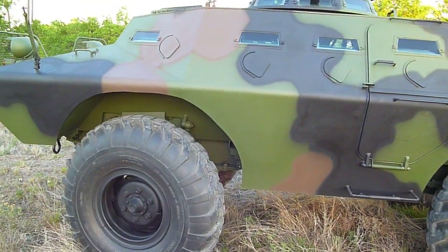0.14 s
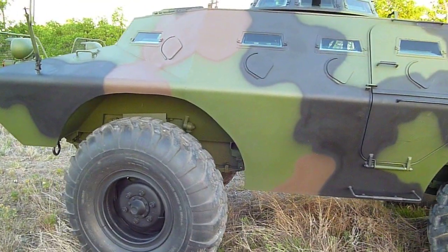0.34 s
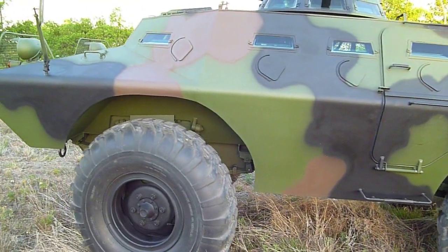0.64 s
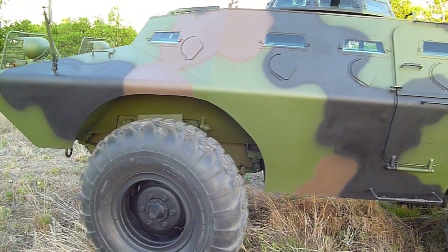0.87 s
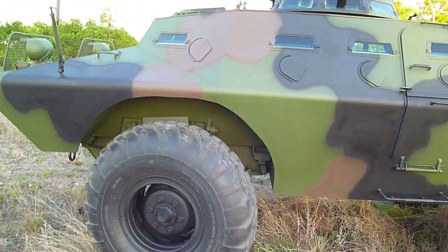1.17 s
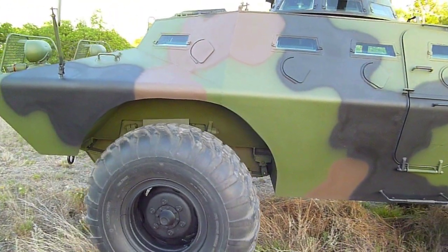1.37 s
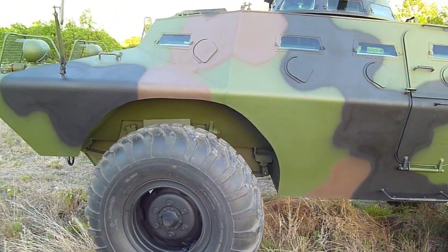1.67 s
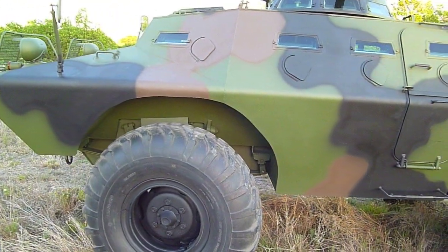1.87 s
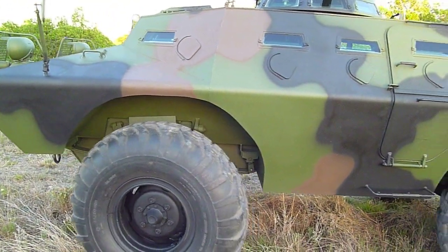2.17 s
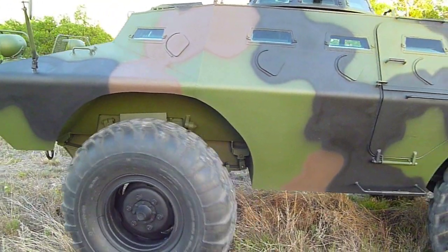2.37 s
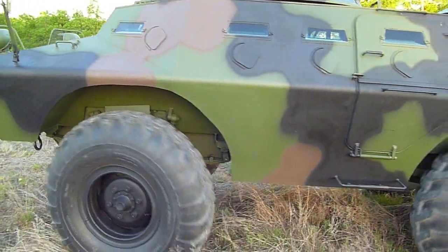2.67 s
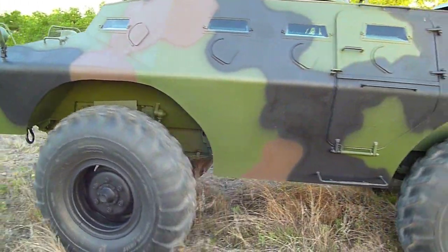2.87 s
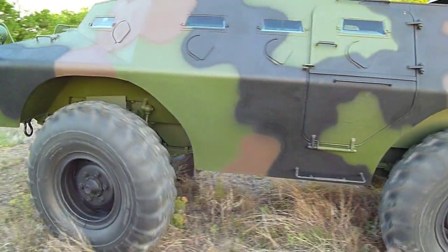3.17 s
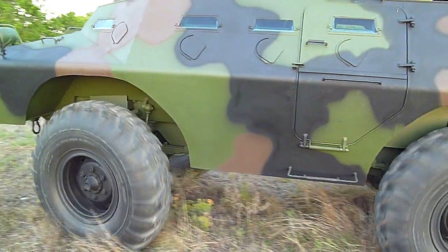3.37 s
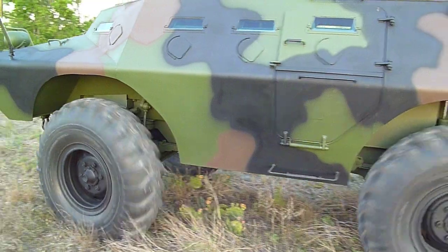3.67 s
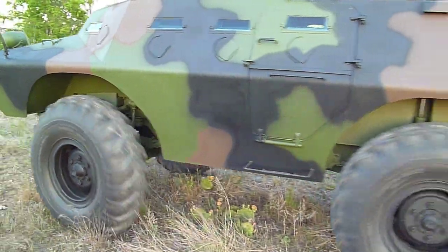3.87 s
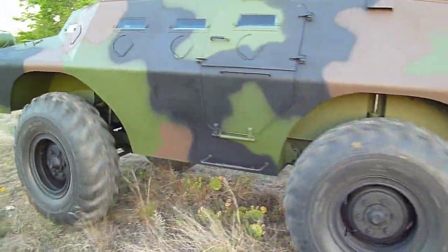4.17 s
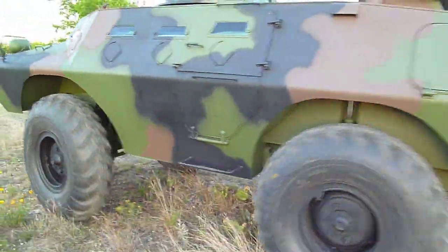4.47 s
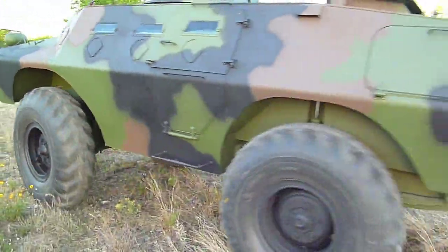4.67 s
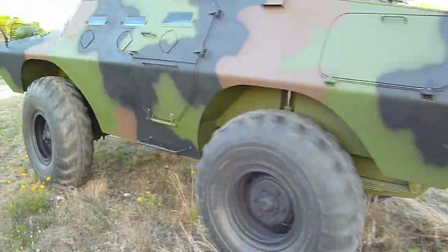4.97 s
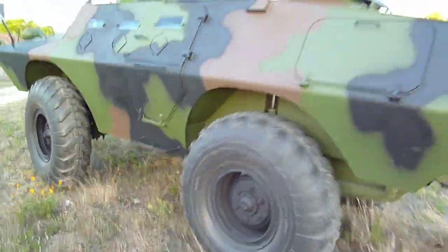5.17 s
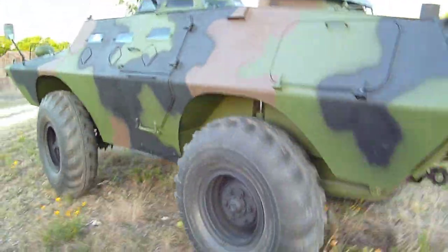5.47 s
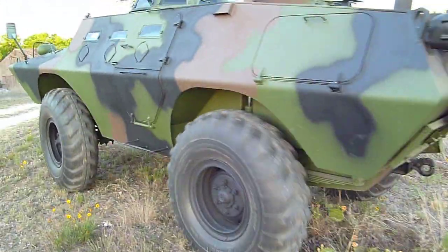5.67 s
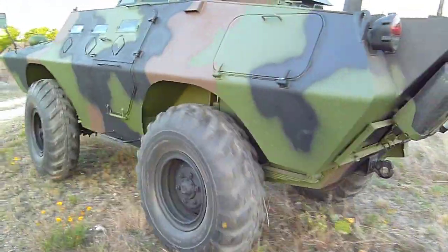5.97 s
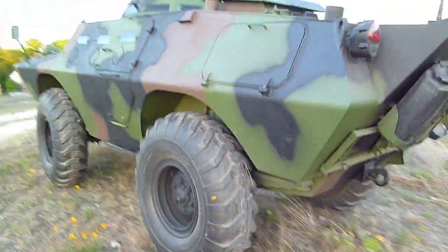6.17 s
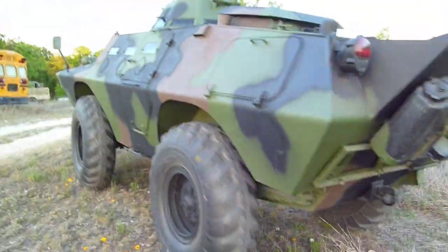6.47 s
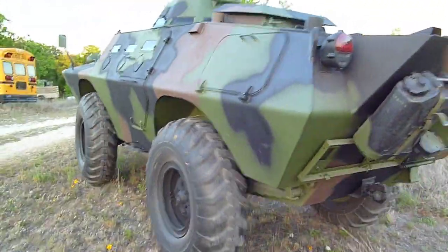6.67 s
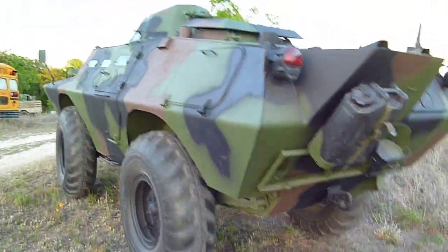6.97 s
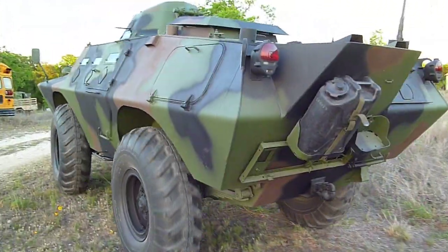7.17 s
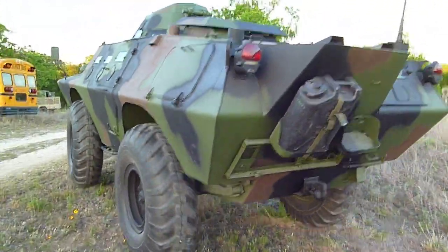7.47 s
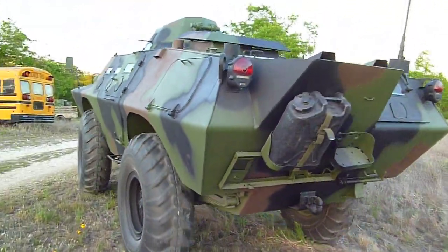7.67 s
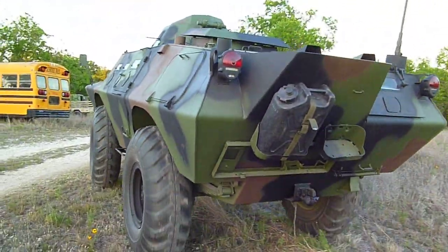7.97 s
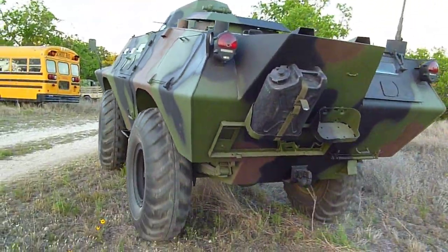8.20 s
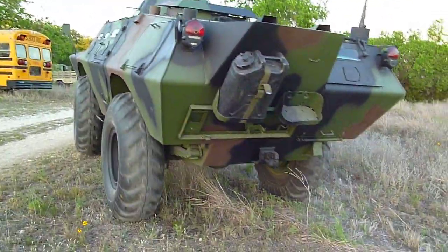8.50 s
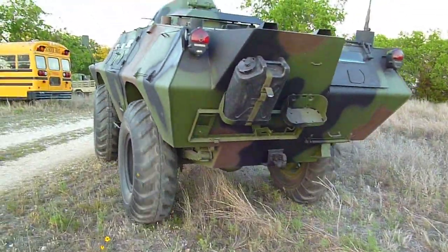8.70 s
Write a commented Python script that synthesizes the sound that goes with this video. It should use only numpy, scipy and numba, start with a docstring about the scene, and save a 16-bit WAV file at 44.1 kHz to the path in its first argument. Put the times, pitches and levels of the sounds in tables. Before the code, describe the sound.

A heavy diesel armored vehicle idles with a limping beat, revs up under load, then growls away steadily, tail toward the listener.

```python
"""A heavy eight-cylinder diesel vehicle idles, takes load, climbs out of a ditch and turns its tail to the listener.
Exhaust: firing clicks ring pipe resonances; from the side one weak cylinder makes the beat limp once a cycle.
Each firing also sends noise bursts through the steel hull, rings the block, shakes plates and clatters in the treble;
reflections of the rear clatter, their delay growing, are bands at fixed pitches whose levels shift downwards.
Bumps ring the hull early; a gear sine whines on the climb; ground dips slide down as the vehicle draws away."""
import sys
import numpy as np
from scipy import signal
from scipy.fft import rfft, irfft, next_fast_len
from scipy.io import wavfile
from scipy.ndimage import uniform_filter1d
from numba import njit

SR = 44100
rng = np.random.default_rng(int(sys.argv[2]) if len(sys.argv) > 2 else 0)


def materialize(psi):
    """Save the field psi as 16-bit PCM at rate SR to the path in sys.argv[1].

    A 1-D psi becomes a single channel; in a 2-D psi each row is a channel.
    """
    bounded = np.clip(np.atleast_2d(psi).T, -1, 1)
    quanta = np.round(bounded * 32767).astype(np.int16)
    wavfile.write(sys.argv[1], SR, quanta)


N = 389833

# engine speed: t/s, firing rate/Hz
FIRING_RATE = [(0.0, 57.73), (1.17, 58.61), (1.61, 75.01), (1.81, 72.56), (1.99, 67.87), (2.31, 69.96),
               (2.74, 65.18), (3.05, 68.73), (3.49, 79.58), (3.87, 86.61), (5.09, 90.89), (5.51, 93.49),
               (5.79, 92.51), (6.76, 92.1), (7.26, 93.69), (7.88, 96.45), (8.18, 93.86), (8.84, 92.21)]
# turn of the vehicle: t/s, share seen from behind/0-1
VIEW_BEHIND = [(0, 0.06), (3.2, 0.01), (4.2, 0.45), (5.3, 0.71), (6.3, 0.92), (8.84, 1)]
# engine effort: t/s, level re full pull/dB
EFFORT = [(0, -4), (.4, -7), (.6, -8), (1.1, -5), (1.35, -1.5), (1.9, -0.5), (2.9, 1), (3.3, 2), (3.7, -1),
          (4.3, 0.5), (5.9, 1), (6.4, 0.5), (8, 1), (8.63, .5), (8.72, -4), (8.84, -3.5)]
# cylinders in firing order, relative: puff/dB, puff lead/firing intervals, knock/dB, valve hiss/dB
SIDE_CYLINDERS = [(3, 0.21, 14, 8), (-1, 0.16, 9.5, 3.5), (2, 0.18, -4, -0.5), (0.5, 0.13, 3, 5.5),
                  (4, 0.17, 1.5, -7), (1, .25, 10.5, 8), (-1, .22, -12.5, -2.5), (-22.5, 0.74, -19, -23.5)]
REAR_CYLINDERS = [(.2, 0, 0, 1), (-4.3, .12, 1, 4), (-.1, .22, 2, 2), (-6.5, .03, -1, 1),
                  (-4.2, .06, -2, -4), (1.7, .13, 6, 3), (-1.8, .14, 2, 4), (-3.6, .48, -6, -9)]
# exhaust pipe resonances: f/Hz, width/Hz, level/dB, polarity/+-1
SIDE_PIPE = [(40.3, 14, 3.5, 1), (121.6, 16, -8, -1), (169, 81, -16, -1), (278.2, 24, -12.5, 1),
             (444, 280, -24.5, -1)]
REAR_PIPE = [(159.6, 16, 1.8, -1), (98.6, 208, -3.4, 1), (203.5, 28, -1.5, -1), (241.6, 21.9, -4.6, -1),
             (277.3, 35, -10, -1), (329.2, 25.8, -10.6, -1), (306.3, 16, -6.5, -1), (515.6, 21.4, -4.8, 1),
             (631.3, 69, -11.8, -1)]
# hull colour of rumble and knock: f/Hz, relative gain/dB
SIDE_COLOUR = [(71, -47.5), (120, -1.5), (221, -9), (274, -4.5), (400, -16), (453, -12), (572, -20),
               (723, -18), (981, -20), (2050, -11.5), (4280, -40), (4760, -41), (5600, -36), (7330, -41),
               (8770, -59), (11400, -99), (19300, -120)]
REAR_COLOUR = [(71, -36.5), (120, -3), (198, -12), (269, -17.5), (305, -15.5), (393, -17), (450, -17.5),
               (523, -20.5), (750, -20), (929, -21), (1170, -19.5), (1540, -21), (3270, -24), (6820, -33),
               (8770, -50.5), (11400, -109), (19300, -120)]
# hull panels that ring (+) or swallow (-): f/Hz, width/Hz, boost/dB
SIDE_PANELS = [(290.6, 1.8, 5), (684, 83, 2.5), (1650, 360, -2), (3640, 120, -1), (4210, 300, 10.5),
               (5340, 200, 4)]
REAR_PANELS = [(3850, 280, 1.5)]
# engine block modes: f/Hz, side level/dB, rear level/dB, t60/s
BLOCK_MODES = [(1050, 0, -12.5, 0.017), (1600, 4.5, -7.5, 0.012), (1715, 2.5, -8, 0.022),
               (1944, -2.5, -4.5, 0.028), (2094, 3, -12.5, 0.025), (2453, -1, 0, 0.025),
               (2900, -14, 4, 0.0035), (3330, -24.5, -9, 0.0043), (3565, -11, -4, 0.036),
               (3850, -10, -10.5, 0.028), (4260, -2, -9, 0.016), (4700, -9, -6.5, 0.022),
               (5750, -4, -11, 0.028)]
# block clack: t/s, level/dB
CLACK_LEVEL = [(0, -57), (.5, -67), (1.1, -58), (1.4, -41.5), (2.1, -42.5), (2.9, -39.5), (3.3, -45),
               (3.7, -57.5), (4.2, -81), (5.1, -60), (5.9, -64), (6.9, -50), (7.5, -42.5), (8.6, -43.5),
               (8.72, -70)]
# dull hull bumps: t/s, strength/dB, brightness/dB
BUMPS = [(0.062, -13.5, -0.5), (0.068, -10, -5), (0.207, -14, -15), (0.221, -14, -17), (0.232, -8.5, -17),
         (0.247, -9, -20), (0.254, -7, -16), (0.257, -4.5, -23), (0.284, -7, -24), (0.332, -11.5, -5),
         (0.344, -13, -5), (0.362, -11, -4), (0.378, -14.5, -5)]
# hull modes rung by the bumps: f/Hz, level/dB, t60/s
BUMP_MODES = [(183, -9, 0.03), (246, 5.5, 0.044), (329, 3, 0.023), (403, -3, 0.028), (520, -10, 0.019),
              (720, -6.5, 0.066), (895, -3.5, 0.024), (1134, -11, 0.078), (1380, -9, 0.022),
              (1670, -12.5, 0.026)]
# gear whine: t/s, level/dB
WHINE_LEVEL = [(0, -76.5), (2.5, -67.5), (2.7, -35), (3.05, -31.5), (3.36, -42), (3.46, -21.5), (4.1, -22),
               (4.4, -29), (4.7, -32), (5.2, -34.5), (5.8, -30.5), (7, -35), (8, -44.5), (8.84, -66)]
# exhaust bark, cylinders in firing order: level/dB
BARK_CYLINDERS_DB = [-19.5, -5.5, -7, -17.5, -18, 1, -8, -14]
# droning rear plates: f/Hz, width of each of two equal resonances/Hz
PLATES = [(152, 7.9), (312, 18), (527, 37), (625, 53), (700, 26)]
# plate drone as the tail swings round: t/s, level/dB for each plate
PLATE_LEVELS = [(0, -60, -64.5, -55, -65, -59), (4, -43, -53, -58, -53, -47),
                (4.6, -22.5, -35.5, -58, -50, -38.5), (5.3, -31, -39, -50.5, -43, -49),
                (6.1, -28, -34.5, -47.5, -54, -60.5), (6.998, -33.5, -32.5, -48, -38, -43),
                (7.6, -34, -50, -43, -53, -40), (8.099, -43, -45, -34.5, -37, -41),
                (8.6, -36, -60, -35, -35, -51), (8.75, -49, -52, -53, -40, -39.5)]
# treble bands of the reflected rear clatter: f/Hz, width of each of two equal resonances/Hz
CLATTER_BANDS = [(1150, 300), (1850, 260), (2020, 160), (3040, 330), (3300, 300), (4380, 380), (4950, 380),
                 (5350, 380)]
# clatter sinking in pitch as the reflection delay grows: t/s, level/dB for each band
CLATTER_LEVELS = [(0, -63.5, -74.5, -62, -77, -83, -67, -88, -81.5),
                  (4, -64.5, -58.5, -61.5, -64, -51, -63, -74, -66),
                  (4.4, -66, -67, -60.5, -67, -52, -73, -71, -53),
                  (5, -67, -57, -53, -52, -55.5, -67, -67, -70),
                  (5.5, -56, -63, -53, -57, -53, -52.5, -67, -76),
                  (6.1, -49, -57, -46, -56, -46, -55, -64, -68),
                  (6.7, -49, -48, -54, -58, -59, -52, -69, -66.5),
                  (7.2, -45, -45.5, -61, -47, -66, -50.5, -56, -69),
                  (7.798, -38, -50, -64, -42.5, -58, -66, -51, -66),
                  (8.6, -41.5, -51, -67, -53.5, -44, -64, -69, -55),
                  (8.75, -42, -49, -64, -61, -63, -74, -75, -77)]
# ground reflection dips, one curve each: t/s, f/Hz, share cancelled/0-1
DIPS = [
    [(0, 600, 0.55), (3.0, 590, 0.65), (3.7, 526, 0.8), (4.5, 526, .7), (5.2, 475, 1), (6.4, 437, 0.88),
     (8.84, 440, 0.6)],
    [(0, 950, 0), (5.5, 950, 0.17), (6.5, 900, 0.52), (8.84, 830, 0.73)],
    [(0, 1800, 0), (4.8, 1830, 0.32), (5.6, 1750, .55), (7, 1600, 0.86), (8.84, 1440, .6)],
    [(0, 2580, 0.15), (5, 2580, 0), (5.8, 2470, 0), (7, 2270, 0.66), (8.84, 2120, 0.3)],
    [(0, 4200, 0.04), (7, 4150, 0), (7.8, 4030, 0.4), (8.84, 3730, 0.4)],
]
# width of each dip: width/Hz
DIP_WIDTHS_HZ = (70.4, 150, 262, 258, 350)

# layers at full pull: side/dB, rear/dB, dB per dB of effort
EXHAUST_DB, RUMBLE_DB, KNOCK_DB = (-21, -19.5, 0.65), (-23.5, -27, 1.2), (-43.5, -38.5, 1.27)
SIZZLE_DB = (-1.14, -6.06, 0.077)   # valve hiss re middle of knock
SHARPNESS = (.4, 1, 0.074)   # side, rear, rise per dB of effort; limited to 0-1
BARK_DB, BARK_BAND_HZ = -37, (250, 1144)
SIDE_SILENCER_HZ, REAR_SILENCER_HZ = 380, 390
KNOCK_SCATTER_DB = 2.0
RUMBLE_FOLLOWS_KNOCK = .5   # dB per dB: rumble limps less than knock
HISS_SMOOTH_S, AIR_SMOOTH_S = 0.0087, 0.0039
TEETH_PER_FIRING = 4.25
MIC_LOW_CUT_HZ, MIC_ROLLOFF_HZ, MIC_STOP_HZ = 67.6, 7800, 9150
MIC_OFFSET = .012


def amp(db):
    """Decibels to gain."""
    return 10 ** (np.asarray(db) / 20)


def in_time(rows):
    """Columns of a curve table, one value per sample."""
    s, *columns = np.transpose(rows)
    return [np.interp(np.arange(N) / SR, s, c) for c in columns]


def evened(x, seconds=0.47):
    """Level held near rms 1 over a few engine cycles."""
    span = int(seconds * SR)
    power = uniform_filter1d(uniform_filter1d(x ** 2, size=span), size=span)
    return x / np.sqrt(power + 1e-20)


def filtered(x, response):
    """Apply a response given as a function of frequency."""
    padded = next_fast_len(N + SR)
    hz = np.arange(padded // 2 + 1) * SR / padded + 1e-3   # keeps off zero
    return irfft(rfft(x, padded) * response(hz), padded)[:N]


def resonance(hz, centre_hz, width_hz):
    """Second-order band-pass, gain 1 at the centre."""
    return 1j * hz * width_hz / (centre_hz ** 2 - hz ** 2 + 1j * hz * width_hz)


def causal(gain):
    """Minimum phase for a gain curve: rings only after the blow."""
    cepstrum = irfft(np.log(gain + 1e-9))
    half = len(cepstrum) // 2
    folded = np.r_[cepstrum[0], 2 * cepstrum[1:half], np.zeros(len(cepstrum) - half)]
    return np.exp(rfft(folded))


def decaying(x, seconds):
    """Each click becomes an exponential decay."""
    return signal.lfilter([1], [1, -np.exp(-1 / (seconds * SR))], x)


def drift(rate_hz):
    """Slow random curve through unit-spread knots."""
    knots = int(N / SR * rate_hz) + 2
    return np.interp(np.linspace(0, knots - 1, N), np.arange(knots), rng.standard_normal(knots))


def firings(count, level_db, lead, scatter_db, jitter):
    """One click per firing; eight cylinders differ, level and timing scatter (lead, jitter in intervals)."""
    stroke = np.arange(1, int(count[-1]))
    chance = rng.standard_normal((len(stroke), 2))
    due = stroke - np.asarray(lead)[stroke % 8] + jitter * chance[:, 0]
    at = np.minimum(np.searchsorted(count, due), N - 1)
    clicks = np.zeros(N)
    np.add.at(clicks, at, amp(np.asarray(level_db)[stroke % 8] + scatter_db * chance[:, 1]))
    return clicks


def exhaust(count, cylinders, pipe, silencer_hz):
    """Puffs, rounded off by the silencer, ring the pipe resonances in parallel."""
    puff_db, lead = np.transpose(cylinders)[:2]
    puffs = firings(count, puff_db, lead, scatter_db=.8, jitter=.012)
    rounded = filtered(puffs, lambda f: 1 / (1 + (f / silencer_hz) ** 4))

    def pipe_response(f):
        return sum(amp(db) * np.sign(sign) * resonance(f, hz, width) for hz, width, db, sign in pipe)

    return evened(filtered(rounded, pipe_response))


def knock(count, cylinders, colour, panels, sharpness, sizzle_db, punch, floor_hz):
    """Firing pulses and dying noise bursts, coloured by the hull in four bands; returns rumble and treble."""
    hz_points, db_points = np.transpose(colour)
    knock_db, hiss_db = np.transpose(cylinders)[2:]
    sharp = np.clip(sharpness, 0, 1)

    def hull(f):
        boost = sum(db * abs(resonance(f, hz, width)) ** 2 for hz, width, db in panels)
        return causal(amp(np.interp(np.log(f), np.log(hz_points), db_points) + boost))

    def burst(level_db, fast_s, slow_s, steady, step, smooth_s=0, scatter_db=KNOCK_SCATTER_DB):
        blows = firings(count, level_db, np.full(8, .02), scatter_db=scatter_db, jitter=.012)
        crack = evened(decaying(blows, fast_s))
        blowdown = evened(decaying(blows, slow_s))
        gate = sharp * crack + 0.35 * (1 - sharp) * blowdown + steady
        gate = uniform_filter1d(gate, size=int(smooth_s * SR) + 1)
        return gate * rng.standard_normal(N) - step * evened(blows)

    rumble = filtered(burst(RUMBLE_FOLLOWS_KNOCK * knock_db, 0.0065, 0.0047, 0.93, punch),
                      lambda f: hull(f) / (1 + (f / 900) ** 4) / (1 + (floor_hz / f) ** 6))
    middle = filtered(burst(knock_db, 0.01, 0.011, 0.55, 0.16),
                      lambda f: hull(f) / (1 + (900 / f) ** 4) / (1 + (f / 2700) ** 6))
    top = filtered(burst(hiss_db, 0.0041, 0.02, 0.29, 0.046, HISS_SMOOTH_S, scatter_db=5.0),
                   lambda f: hull(f) / (1 + (2700 / f) ** 6) / (1 + (f / 5600) ** 8))
    air = filtered(burst(hiss_db, 0.0042, 0.02, 0.51, 0.03, AIR_SMOOTH_S, scatter_db=3.5),
                   lambda f: hull(f) / (1 + (5600 / f) ** 8))
    return evened(rumble), evened(middle) + amp(sizzle_db) * evened(top + air)


def clack(count, behind):
    """Each firing rings the engine block briefly; the valves set the pattern of the upper modes."""
    out = 0
    for hz, side_db, rear_db, t60_s in BLOCK_MODES:
        column = 3 if hz > 2700 else 2   # valve hiss or knock
        side, rear = (firings(count, 1.3 * np.transpose(c)[column], np.full(8, .02), scatter_db=4.0, jitter=.03)
                      for c in (SIDE_CYLINDERS, REAR_CYLINDERS))
        blows = (1 - behind) * amp(side_db) * side + behind * amp(rear_db) * rear
        r, w = amp(-60 / (t60_s * SR)), 2 * np.pi * hz / SR
        out = out + signal.lfilter([0, np.sin(w)], [1, -2 * r * np.cos(w), r * r], blows)
    return evened(out)


def bumps():
    """Each bump strikes decaying hull modes; its brightness sets the upper modes."""
    out, t = np.zeros(N), np.arange(SR // 4) / SR
    soft_contact = 1 - np.exp(-t / 0.0012)
    strengths = rng.standard_normal((len(BUMPS), len(BUMP_MODES)))
    for (s, strength_db, bright_db), chance in zip(BUMPS, strengths):
        at = round(s * SR)
        for (hz, db, t60_s), luck in zip(BUMP_MODES, chance):
            tilt_db = bright_db * np.clip(hz / 500 - .8, 0, 1)
            level_db = strength_db + db - 6 + 1.2 * luck + tilt_db
            out[at:at + len(t)] += amp(level_db - 60 * t / t60_s) * np.sin(2 * np.pi * hz * t) * soft_contact
    return out


def gear_whine(firing_hz):
    """Gear teeth mesh in step with the engine: a sine wavering in level and phase."""
    level_db, = in_time(WHINE_LEVEL)
    turn = 2 * np.pi * np.cumsum(TEETH_PER_FIRING * firing_hz) / SR
    return np.sqrt(2) * amp(level_db + 2.0 * drift(25)) * np.sin(turn + 0.4 * drift(30))


def bark(count):
    """From behind, the edge of each exhaust puff is a sharp, band-limited drop in pressure."""
    edges = firings(count, BARK_CYLINDERS_DB, np.full(8, -.03), scatter_db=1.2, jitter=.008)
    band = signal.butter(2, BARK_BAND_HZ, "band", fs=SR, output="sos")
    return -evened(signal.sosfilt(band, edges + 1e-18))


def shaken(count, resonances, levels, stroke_db, scatter_db, jitter, rattle_s):
    """Uneven firing shakes, as clicks or noise rattles, sound each fixed resonance at its own level."""
    out = 0
    for (hz, width), db in zip(resonances, in_time(levels)):
        shakes = firings(count, stroke_db, np.zeros(8), scatter_db, jitter)
        if rattle_s:
            shakes = decaying(shakes, rattle_s) * rng.standard_normal(N)
        out = out + amp(db) * evened(filtered(shakes, lambda f: resonance(f, hz, width) ** 2))
    return out


def plates(count):
    """Rear plates drone, clicked by each firing."""
    knock_db = np.transpose(REAR_CYLINDERS)[2]
    return shaken(count, PLATES, PLATE_LEVELS, knock_db, scatter_db=2.0, jitter=.09, rattle_s=0)


def reflected_clatter(count):
    """Reflections of the rear clatter: treble bands of short noise bursts, sinking as the delay grows."""
    hiss_db = np.transpose(REAR_CYLINDERS)[3]
    return shaken(count, CLATTER_BANDS, CLATTER_LEVELS, hiss_db, scatter_db=1.5, jitter=.04, rattle_s=.006)


@njit
def sliding_dip(x, hz, share, r, rate):
    """Take away a share of what a moving resonance passes."""
    out, y1, y2 = x.copy(), 0., 0.
    for i in range(2, len(x)):
        y = (1 - r * r) / 2 * (x[i] - x[i - 2]) + 2 * r * np.cos(2 * np.pi * hz[i] / rate) * y1 - r * r * y2
        y1, y2 = y, y1
        out[i] -= share[i] * y
    return out


def ground(x):
    """Ground reflection cancels the direct sound at moving dips, in series."""
    for curve, width_hz in zip(DIPS, DIP_WIDTHS_HZ):
        hz, share = in_time(curve)
        x = sliding_dip(x, hz, np.clip(share, 0, 1), np.exp(-np.pi * width_hz / SR), SR)
    return x


def scene():
    """Side and rear views cross-fade as the vehicle turns; the ground dips cut all but whine and bumps."""
    firing_hz, = in_time(FIRING_RATE)
    count = np.cumsum(firing_hz) / SR
    effort_db, = in_time(EFFORT)
    clack_db, = in_time(CLACK_LEVEL)
    behind, = in_time(VIEW_BEHIND)
    behind = np.clip(behind, 0, 1)
    rear, side = np.sqrt(behind), np.sqrt(1 - behind)
    exhaust_db, rumble_db, knock_db, sizzle_db, sharpness = (
        (1 - behind) * a + behind * b + follows * effort_db
        for a, b, follows in (EXHAUST_DB, RUMBLE_DB, KNOCK_DB, SIZZLE_DB, SHARPNESS))

    side_pipe = exhaust(count, SIDE_CYLINDERS, SIDE_PIPE, SIDE_SILENCER_HZ)
    rear_pipe = exhaust(count, REAR_CYLINDERS, REAR_PIPE, REAR_SILENCER_HZ)
    pipe = evened((1 - behind) * side_pipe + behind * rear_pipe)

    side_low, side_high = knock(count, SIDE_CYLINDERS, SIDE_COLOUR, SIDE_PANELS, sharpness, sizzle_db,
                                punch=0.42, floor_hz=154)
    rear_low, rear_high = knock(count, REAR_CYLINDERS, REAR_COLOUR, REAR_PANELS, sharpness, sizzle_db,
                                punch=0.12, floor_hz=187.0)
    hull = amp(rumble_db) * (side * side_low + rear * rear_low)
    hull = hull + amp(knock_db) * (side * side_high + rear * rear_high)
    hull = hull + amp(clack_db) * clack(count, behind)

    engine = amp(exhaust_db) * pipe + hull
    engine = engine + behind * amp(BARK_DB + effort_db) * bark(count)
    engine = engine + plates(count) + reflected_clatter(count)
    return (ground(engine) + gear_whine(firing_hz) + bumps())[None, :]


def record(dry):
    """The microphone loses deep bass, rounds peaks, cuts the top and adds a small offset."""
    low_cut = signal.butter(2, MIC_LOW_CUT_HZ, "high", fs=SR, output="sos")
    rolloff = signal.butter(4, MIC_ROLLOFF_HZ, fs=SR, output="sos")
    top_cut = signal.cheby2(20, 60, MIC_STOP_HZ, fs=SR, output="sos")   # 60 dB down from the stop edge
    thin = signal.sosfilt(low_cut, dry)
    soft = signal.sosfilt(rolloff, 0.39 * np.tanh(thin / 0.41))
    return signal.sosfilt(top_cut, soft) + MIC_OFFSET


dry = scene()
out = record(dry)
materialize(out)
```